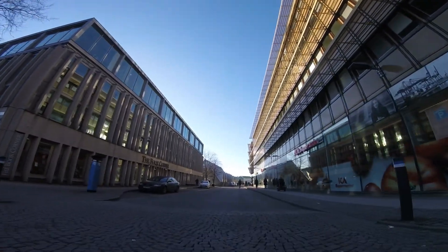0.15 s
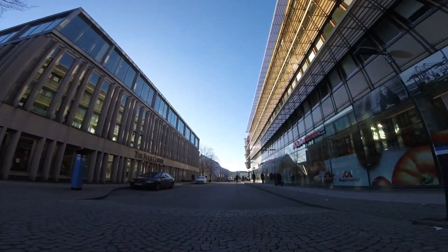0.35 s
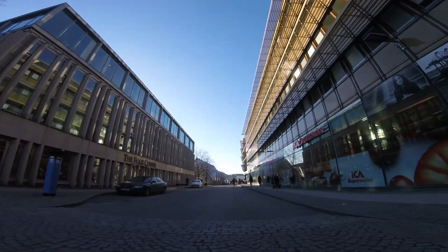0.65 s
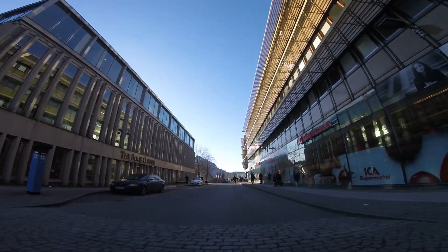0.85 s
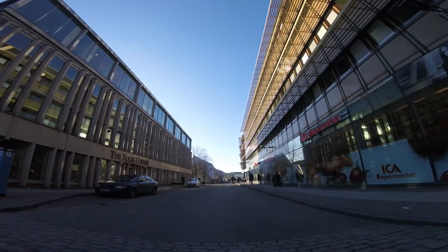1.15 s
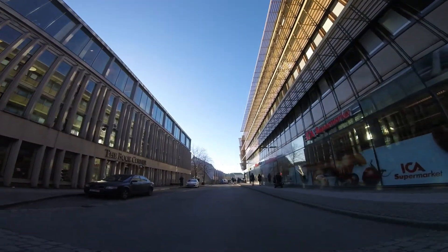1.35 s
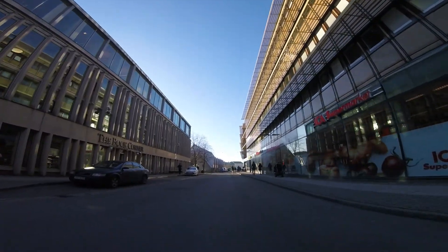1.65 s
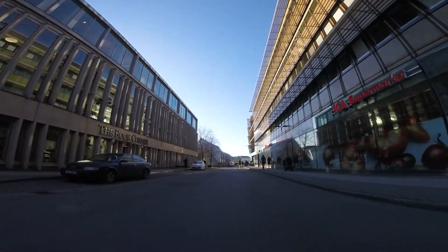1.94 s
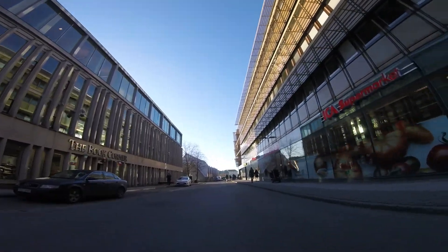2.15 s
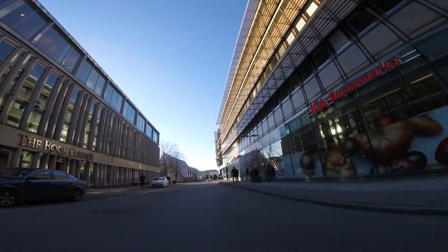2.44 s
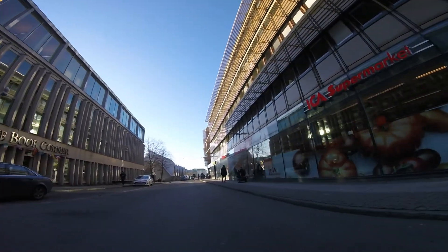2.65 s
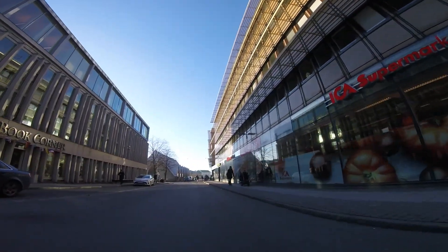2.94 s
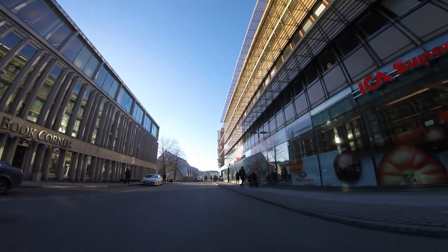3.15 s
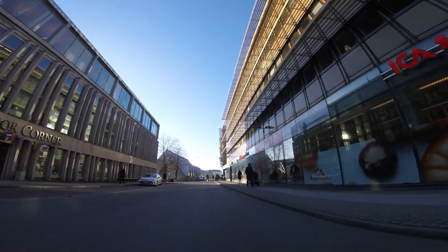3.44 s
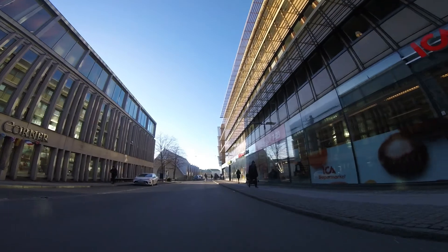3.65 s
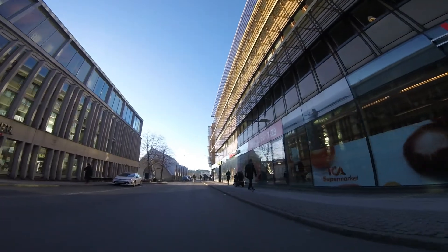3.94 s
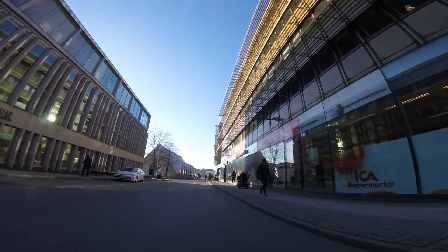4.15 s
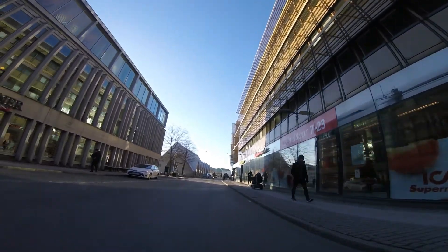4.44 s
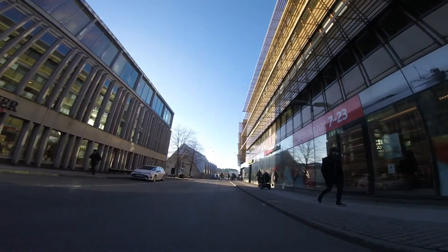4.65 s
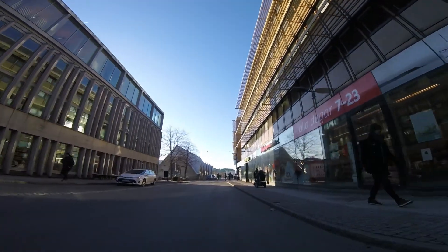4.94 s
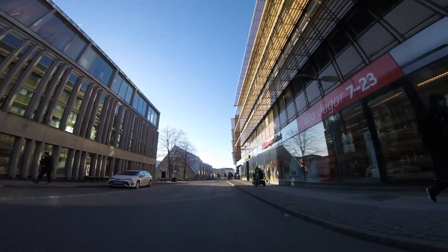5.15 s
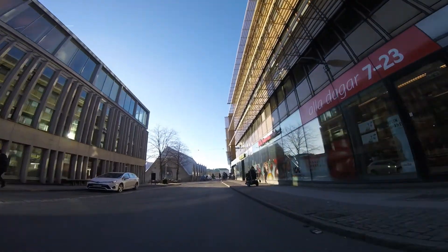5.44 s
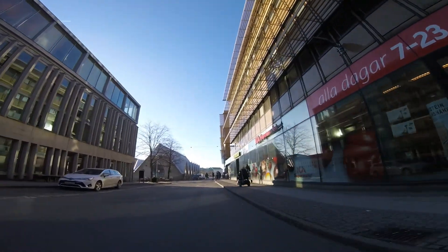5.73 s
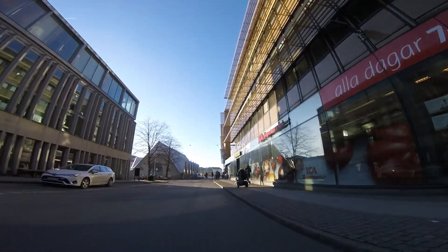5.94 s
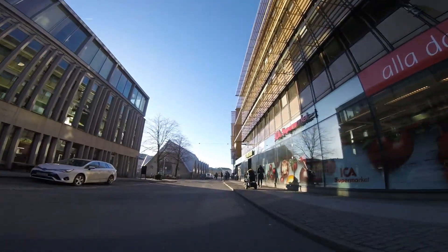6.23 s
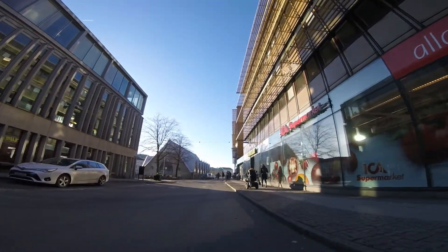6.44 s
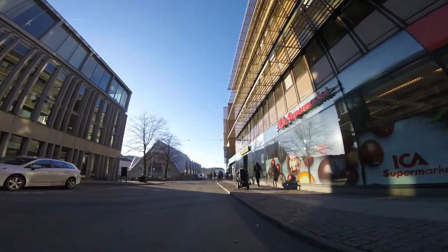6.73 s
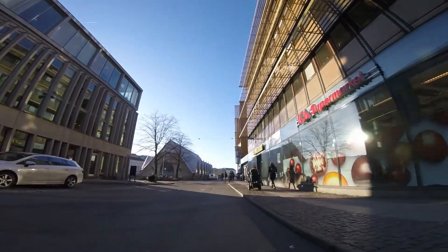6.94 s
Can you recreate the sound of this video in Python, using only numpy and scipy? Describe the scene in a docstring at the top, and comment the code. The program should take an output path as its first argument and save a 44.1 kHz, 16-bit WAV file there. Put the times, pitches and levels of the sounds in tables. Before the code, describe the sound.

A bicycle rides along a street at a steady pace, heard close up from the handlebar. From the start until about 2.2 seconds it crosses cobblestones, the loudest part: a deep, shaking rumble with rapid, uneven low thuds from the tyres, hollow knocks and faint metallic rattles. The mudguard clatters around 0.4 and 1.5 seconds, and most strongly near 2 seconds.

From about 2.4 seconds the bicycle rolls on asphalt, quieter and smoother, with a low, wavering tyre hum, light vibration and a faint rush of air. Low wind buffets the microphone, swelling just after 4 seconds and again more gently from about 5.7. The microphone mount gives short knocks near 2.8, 4.5 and 5.1 seconds, then softer ones around 6.3 and 6.8. A few pebbles tick faintly off the tread, and the rolling continues to the end at about 7 seconds.

```python
"""On a cobbled street that gives way to asphalt, a bicycle gathers speed, heard from a handlebar camera.
The road forces fork, frame and tyre walls to vibrate at their resonances, more strongly as roughness
and speed rise. The tread hums at the rate its blocks meet the ground. The camera case rumbles, shaken by
the cobbles at first, then buffeted by wind. Impacts excite decaying modes: the mount knocks on bumps,
the mudguard clatters and loose metal rattles faintly. Stones thud and pebbles tick off the tread."""
import sys
import numpy as np
from scipy import signal
from scipy.fft import rfft, irfft
from scipy.io import wavfile

SR = 44100
rng = np.random.default_rng(int(sys.argv[2]) if len(sys.argv) > 2 else 0)


def unload_audio(sound):
    """Save the sound as a 16-bit wav file, at the path given as the first command line argument."""
    columns = np.transpose(np.atleast_2d(sound))
    # keep every value between -1 and 1, then stretch to whole-number steps
    steps = np.round(np.clip(columns, -1, 1) * 32767)
    wavfile.write(sys.argv[1], SR, steps.astype(np.int16))


N = 312228

# roughness of the road, cobbles and then asphalt: (time [s], level over plain asphalt [dB])
ROUGHNESS = [(0, 10), (0.16, 8.5), (0.25, -1), (0.42, 7.5), (0.6, 7), (0.8, 6.5), (0.92, 4.5), (1.01, 0),
             (1.13, 13.5), (1.3, 5.5), (1.45, 11.5), (1.65, 2.5), (1.73, 7.5), (1.86, 3), (1.95, 8),
             (2.23, 11), (2.38, 2.5), (2.9, 2), (3.3, 1.7), (3.8, 0.8), (4.4, 4), (4.85, 0.5), (7.08, 5)]
# speed of the bicycle: (time [s], speed [m/s])
SPEED = [(0, 3.93), (1.299, 3.787), (3.499, 3.84), (5.1, 4.077), (6.099, 4.245), (7.08, 4.27)]
# bounce of tyres and fork: (frequency [Hz], bandwidth [Hz], gain [dB])
FORK_RESONANCES = [(68, 65, -11.5), (103.8, 15, 9.5), (122, 9.8, -1.5), (137, 25, -12.5)]
# frame and handlebar: (frequency [Hz], bandwidth [Hz], gain [dB])
FRAME_RESONANCES = [(147.2, 24.2, 4.5), (198, 21, -7), (237, 31, -8), (292.3, 18.6, -7.5),
                    (381.8, 53, -8.5)]
# tyre walls: (frequency [Hz], bandwidth [Hz], gain [dB])
TYRE_RESONANCES = [(519.2, 36, 5), (549.4, 16, 2.5), (694, 56, -9), (783, 40, -12), (946, 14, -23.5)]
# strength of the tread hum: (time [s], relative level [dB])
HUM_LEVEL = [(0, -25.5), (0.42, -20), (0.75, -38), (1.0, -33), (1.08, -15.5), (1.2, -27.5), (1.599, -25.5),
             (2.119, -33), (2.23, -17.5), (2.42, -29), (2.95, -43), (3.35, -21), (3.55, -34), (3.88, -20),
             (4.15, -34), (4.799, -29), (5.2, -20.5), (5.5, -32), (6.55, -21.5), (7.08, -28)]
# air in the tread grooves, heard through the tyre: (frequency [Hz], bandwidth [Hz], gain [dB])
GROOVE_RESONANCES = [(229.8, 11, 16), (350.7, 24.5, 13.5), (758, 120, -2), (802, 24, -10)]
# wheel rim: (frequency [Hz], bandwidth [Hz], gain [dB])
RIM_RESONANCES = [(1320, 380, 12.5), (1870, 840, -10.5), (2286, 180, 6), (5300, 600, -13.5),
                  (6300, 400, -12)]
# camera case: (frequency [Hz], bandwidth [Hz], gain [dB])
CASE_RESONANCES = [(4936, 200, 1), (5330, 370, 2), (6440, 250, 5), (7400, 2400, -22)]
# low rumble of the case, from cobbles at first and then wind: (time [s], relative level [dB])
RUMBLE_LEVEL = [(0, -28), (0.281, -23), (0.6, -24.5), (1.02, -22), (1.2, -19.5), (1.6, -26), (2.12, -28),
                (2.35, -32), (2.9, -38), (3.85, -37.5), (4.15, -24), (4.8, -34.5), (5.45, -32.5),
                (5.7, -29.5), (7.08, -30)]
# spectra of case rumble, rushing air and microphone hiss: (frequency [Hz], relative density [dB])
RUMBLE_SPECTRUM = [(8, -15.5), (20, 11), (35, 10.5), (55, 10.5), (75, 8.5), (120, 6.5), (300, -36),
                   (1000, -91.5)]
AIR_SPECTRUM = [(600, -10), (850, -22.5), (1100, 0.5), (1500, 1.5), (2200, 2.5), (2550, -1.5), (2900, -5.5),
                (3400, -5.5), (4100, -13.5), (6000, -13), (9000, -16.5), (11000, -34.5)]
HISS_SPECTRUM = [(2000, -8.5), (4200, -36.5), (5200, 5), (7500, 0.5), (9200, -4.5), (10400, -11.5),
                 (11800, -6), (13200, -10), (14200, -20.5)]
# knocks of the mount: (time [s], peak [dB], high-pass [Hz], low-pass [Hz], extra damping [dB/s])
KNOCKS = [(0.009, -24, 400, 1580, 308), (1.11, -30, 800, 3000, 403), (1.934, -19.5, 690, 940, 22),
          (2.576, -32, 590, 1780, 897), (2.801, -22.5, 590, 1190, 198), (4.527, -17.5, 597, 3420, 295),
          (5.097, -22, 1090, 3800, 167), (6.305, -28.5, 1000, 2490, 196), (6.787, -31.5, 700, 2200, 500)]
# camera mount: (frequency [Hz], level [dB], t60 [s])
MOUNT_MODES = [(526, 3.5, 0.015), (770, 0, 0.017), (895, -7, 0.037), (1297, -7.5, 0.018),
               (1734, -3.5, 0.017), (1924, -5.5, 0.015), (2060, -13.5, 0.086), (2470, -8, 0.011),
               (3810, -13.5, 0.0045), (5300, -17, 0.024)]
# highest stone edges under the tyre: (time [s], peak [dB], half-width of the hump [s])
THUDS = [(0.05, -15, 0.0031), (0.094, -14.5, 0.0052), (0.309, -15, 0.0034), (0.438, -13, .0028),
         (0.52, -9, 0.0024), (0.563, -11.5, 0.0045), (0.678, -9, 0.0025), (0.769, -12, 0.0037),
         (0.902, -18, 0.0047), (1.168, -5, 0.0023), (1.236, -18, .006), (1.348, -14, 0.0062),
         (1.404, -14, .005), (1.464, -8.5, 0.0032), (1.547, -10.5, 0.0033), (1.688, -9, 0.0028),
         (1.782, -7.5, 0.0024), (1.831, -18, 0.0057), (1.932, -8.5, 0.0038), (2.064, -9.5, 0.0022)]
# loose metal shaking on its own: (time [s], peak [dB], chatter time [s])
RATTLES = [(.056, -39.5, 0.018), (.087, -33, 0.011), (.184, -36, 0.017), (.298, -37, 0.009),
           (.721, -41.5, 0.031), (1.13, -43, 0.19), (1.743, -34.5, 0.0043), (1.901, -40.5, 0.02),
           (2.575, -43, 0.012), (2.696, -32, 0.0066), (3.586, -43, 0.0061), (4.51, -40, .004)]
# loose metal: (frequency [Hz], level [dB], t60 [s])
METAL_MODES = [(1900, -3, 0.012), (2570, -7, 0.021), (3440, -8.5, 0.008), (5240, 0.5, 0.009),
               (6160, 2, 0.0036), (6470, -12, 0.024), (6680, -1, 0.011), (8900, -14, 0.0038)]
# stones knocking on the tyre: (time [s], peak [dB], contact time [s])
STONES = [(0.143, -30, 0.029), (0.636, -29.5, 0.0036), (0.692, -31, 0.0042), (0.79, -28.5, 0.0052),
          (1.056, -32.5, 0.017), (1.116, -32, .005), (1.187, -31, .006), (1.221, -32, 0.0066),
          (1.27, -38, 0.0042), (1.456, -24.5, 0.0033), (1.491, -30, .006), (1.948, -21.5, 0.004),
          (2.132, -33, 0.0072), (5.515, -27.5, 0.0025)]
# proud stones and dents: (time [s], blow peak [dB], clatter peak [dB], rattle peak [dB], chatter time [s])
JOLTS = [(0.347, -34, -26.5, -42, 0.021), (0.427, -39, -30, -34.5, 0.0094),
         (0.493, -22.5, -29.5, -36, 0.013), (1.456, -25.5, -27, -42, 0.012), (1.58, -29, -25, -39, 0.012),
         (1.928, -21, -20, -29.5, 0.0095), (1.94, -26, -20, -36, 0.017), (2.018, -24, -22.5, -42, 0.022),
         (2.104, -26, -20.5, -45, 0.018), (2.191, -22, -29, -36.5, 0.023), (2.801, -41, -26, -52, 0.0034)]
# hollow frame tubes: (frequency [Hz], level [dB], t60 [s])
TUBE_MODES = [(226, 3.5, 0.037), (298.4, 3, 0.088), (390, -2, 0.07), (505, -16, 0.04)]
# mudguard and carrier: (frequency [Hz], level [dB], t60 [s])
GUARD_MODES = [(292, 4.5, 0.13), (376, 0, 0.029), (532, -0.5, 0.096), (699, 1, 0.035), (790, 5.5, 0.026),
               (864, -0.5, 0.035), (980, -4.5, 0.046), (1390, -7.5, 0.025), (1930, -4.5, 0.009),
               (2470, -8.5, 0.017), (3190, -3, 0.0024)]
# pebbles flicked off the tread: (time [s], peak [dB], pitch [Hz])
PEBBLES = [(.394, -39, 2180), (1.028, -45, 2200), (1.142, -46, 3300), (1.552, -44, 1700),
           (1.678, -41.5, 2200), (1.915, -36, 2350), (1.932, -36.5, 3430), (4.563, -46, 6200),
           (5.884, -39.5, 2000), (6.126, -44, 3900), (6.363, -44, 6940), (6.805, -46, 3200)]

# gain laws: (level when cruising on plain asphalt [dB], share of roughness [1], exponent of speed [1])
BOUNCE_LAW, SHAKE_LAW, ROAR_LAW = (-29.5, 0.66, 1.5), (-31, 0.54, 2.7), (-47.5, 0.78, 2.1)
GRIT_LAW, BUZZ_LAW, AIR_LAW = (-63.5, 0.99, 3), (-65, 0.64, 2.1), (-58, 0.085, 5.3)
CRUISE_M_PER_S, TREAD_BLOCK_SPACING_M = 4.0, 0.034
HISS_DB, CUTOFF_HZ = -67.5, 13900


def from_db(db):
    """Amplitude grows tenfold for every 20 dB."""
    return 10 ** (np.asarray(db) / 20)


def rms_one(x):
    """Normalisation to unit root-mean-square amplitude."""
    return x / np.sqrt(np.mean(x ** 2) + 1e-20)


def in_time(curve):
    """Linear interpolation of a (time, value) curve at every sample."""
    times, values = np.transpose(curve)
    return np.interp(np.arange(N) / SR, times, values)


def drift(rate_hz):
    """Low-passed noise gives a slow random fluctuation of unit rms."""
    step, settling = 40, 2000   # audio samples per step; steps for the filter to settle
    pole = np.exp(-2 * np.pi * rate_hz * step / SR)
    white = rng.standard_normal(N // step + settling + 2)
    slow = signal.lfilter([1], [1, -2 * pole, pole * pole], white)[settling:]
    return np.interp(np.arange(N) / step, np.arange(len(slow)), rms_one(slow))


def cut(x, hz, kind, order=2):
    """A Butterworth low-pass or high-pass falls 6 dB per octave for each order."""
    return signal.sosfilt(signal.butter(order, hz, kind, fs=SR, output="sos"), x)


def noise(spectrum):
    """Spectral shaping turns white noise into coloured noise of unit rms."""
    hz, db = np.transpose(spectrum)
    bins_hz = np.maximum(np.fft.rfftfreq(N, 1 / SR), 1)
    gain = from_db(np.interp(np.log(bins_hz), np.log(hz), db))
    return rms_one(irfft(rfft(rng.standard_normal(N)) * gain, N))


def grains(per_s, spread_db):
    """Shot noise: impulses at random moments, of uneven size and either sign."""
    sizes = from_db(spread_db * np.clip(rng.standard_normal(N), -2, 2)) * rng.choice([-1, 1], N)
    return sizes * (rng.random(N) < per_s / SR) + 1e-18


def resonate(force, resonances):
    """Forced vibration: the responses of parallel damped resonators add."""
    out = np.zeros(len(force))
    for hz, width_hz, db in resonances:
        radius = np.exp(-np.pi * width_hz / SR)
        feedback = [1, -2 * radius * np.cos(2 * np.pi * hz / SR), radius ** 2]
        out += from_db(db) * (1 - radius ** 2) / 2 * signal.lfilter([1, 0, -1], feedback, force)
    return out


def strike(modes, chatter_s, contacts_per_s, after_db, crack_db):
    """Convolution: each contact of a dying flurry excites a crack and the free decay of the modes."""
    t = np.arange(SR // 5) / SR
    force = from_db(after_db) * rng.standard_normal(len(t)) * (rng.random(len(t)) < contacts_per_s / SR)
    force *= np.exp(-(t / chatter_s) ** 2)
    force[0] = 1   # the first contact
    ring = np.zeros(len(t))
    for k, (hz, db, t60) in enumerate(modes):
        envelope = from_db(db + rng.standard_normal() - 60 * t / t60)
        ring += (-1) ** k * envelope * np.sin(2 * np.pi * hz * t)
    crack = cut(rng.standard_normal(len(t)), 690, "high")
    crack = cut(crack, 5300, "low", order=3) * np.exp(-t / 0.0041)
    return signal.fftconvolve(force, ring + from_db(crack_db) * crack)[:len(t)]


def add(out, s, peak_db, sound):
    """Superposition of a sound at a given time and peak level."""
    at = max(round(s * SR), 0)
    out[at:at + len(sound)] += (from_db(peak_db) * sound / np.abs(sound).max())[:N - at]


def driven(law, rough_db, speed):
    """Power law: the amplitude of a source grows with roughness and speed."""
    level_db, share, exponent = law
    return from_db(level_db + share * rough_db) * (speed / CRUISE_M_PER_S) ** exponent


def fork_bounce():
    """Mass-spring resonance: fork and tyres bounce as stones and dents push them."""
    bounce = resonate(grains(per_s=260, spread_db=4.5), FORK_RESONANCES)
    return rms_one(cut(cut(bounce, 182, "low", order=4), 55, "high"))


def frame_shake():
    """Structure-borne sound: the grain of the road shakes frame and handlebar."""
    shake = resonate(grains(per_s=1500, spread_db=4), FRAME_RESONANCES)
    return rms_one(cut(cut(shake, 373.4, "low", order=14), 130.5, "high", order=4))


def tyre_roar():
    """Random excitation: grit under the rubber rings the tyre walls."""
    roar = resonate(grains(per_s=1800, spread_db=-0.5), TYRE_RESONANCES)
    roar = cut(cut(roar, 1180, "low", order=4), 280, "high", order=4)
    return rms_one(roar) * from_db(1.7 * drift(rate_hz=11))


def tread_hum(speed):
    """Periodic excitation: the tread hums at speed over block spacing, wavering in pitch and level."""
    pitch_hz = speed / TREAD_BLOCK_SPACING_M * (1 + 0.022 * drift(rate_hz=8.87))
    phase = 2 * np.pi * np.cumsum(pitch_hz) / SR
    return np.sqrt(2) * np.sin(phase) * from_db(2 * drift(rate_hz=7.8))


def groove_drone(speed):
    """Air pumping: air squeezed from the tread drones louder the faster the wheel turns."""
    drone = resonate(rng.standard_normal(N), GROOVE_RESONANCES)
    drone = cut(cut(drone, 182, "high", order=4), 797, "low", order=6)
    return rms_one(drone) * (speed / speed.mean()) ** 6


def grit_crunch():
    """Impulse excitation: clumps of sand crunch under the tyres and tick in the rim."""
    ticks = resonate(grains(per_s=420, spread_db=4), RIM_RESONANCES) * from_db(2.5 * drift(rate_hz=16))
    return rms_one(cut(ticks, 6700, "low", order=4))


def case_buzz():
    """Contact noise: countless tiny impacts merge into a sizzle at the camera case's resonances."""
    buzz = resonate(grains(per_s=6300, spread_db=7), CASE_RESONANCES)
    buzz = cut(cut(buzz, 4200, "high", order=4), 9000, "low", order=4)
    return rms_one(buzz) * from_db(1.4 * drift(rate_hz=26))


def case_rumble():
    """Random forcing: the camera case rumbles, shaken by the cobbles at first, then buffeted by wind."""
    waver_db = 1.5 * drift(rate_hz=6.6)
    return from_db(in_time(RUMBLE_LEVEL) - 0.1 + waver_db) * noise(RUMBLE_SPECTRUM)


def air_rush():
    """Flow noise: passing air makes a broadband rush that wavers in level."""
    return noise(AIR_SPECTRUM) * from_db(drift(rate_hz=7.2))


def mount_knocks():
    """Impact of the mount on its stop: thinner if glancing, duller if soft, drier if it stays pressed."""
    out = np.zeros(N)
    for s, peak_db, highpass_hz, lowpass_hz, damping_db_per_s in KNOCKS:
        knock = strike(MOUNT_MODES, chatter_s=0.012, contacts_per_s=2000, after_db=-21, crack_db=-15)
        knock *= from_db(-damping_db_per_s * np.arange(len(knock)) / SR)
        add(out, s, peak_db, cut(cut(knock, highpass_hz, "high"), lowpass_hz, "low"))
    return out


def edge_thuds(lead_s=0.03):
    """Acceleration pulse: a stone edge lifts and drops the wheel along a Gaussian hump."""
    t = np.arange(round(2 * lead_s * SR)) / SR - lead_s
    out = np.zeros(N)
    for s, peak_db, half_width_s in THUDS:
        u = t / half_width_s
        acceleration = (u ** 2 - 1) * np.exp(-u ** 2 / 2)   # second derivative of the hump
        add(out, s - lead_s, peak_db, acceleration)
    return out


def metal_rattles():
    """Repeated impact: loose metal parts chatter in short flurries, on their own and at every jolt."""
    out = np.zeros(N)
    at_jolts = [(s, rattle_db, chatter_s) for s, _, _, rattle_db, chatter_s in JOLTS]
    for s, peak_db, chatter_s in list(RATTLES) + at_jolts:
        rattle = strike(METAL_MODES, chatter_s, contacts_per_s=2000, after_db=-1, crack_db=-0.5)
        add(out, s, peak_db, rattle)
    return out


def stone_knocks(damping_db_per_s=250):
    """Damped resonance: a stone rings the tyre walls and deadens them as it presses, a hollow knock."""
    out, t = np.zeros(N), np.arange(SR // 5) / SR
    for s, peak_db, contact_s in STONES:
        push = rng.standard_normal(len(t)) * np.exp(-(t / contact_s) ** 2)
        ring = cut(resonate(push, TYRE_RESONANCES), 1300, "low")
        add(out, s, peak_db, ring * from_db(-damping_db_per_s * t))
    return out


def jolts():
    """Shock excitation: proud stones and dents ring the frame tubes; mudguard and carrier clatter."""
    out = np.zeros(N)
    for s, blow_db, clatter_db, _, chatter_s in JOLTS:
        blow = strike(TUBE_MODES, chatter_s, contacts_per_s=1300, after_db=-10.5, crack_db=-46)
        add(out, s, blow_db, cut(blow, 520, "low", order=4))
        clatter = strike(GUARD_MODES, chatter_s, contacts_per_s=2800, after_db=-6.5, crack_db=-20)
        add(out, s, clatter_db, clatter)
    return out


def pebble_ticks(decay_s=0.0055):
    """Band-limited transients: each pebble flicked off the tread ticks at a pitch of its own."""
    out, t = np.zeros(N), np.arange(SR // 20) / SR
    for s, peak_db, hz in PEBBLES:
        band = signal.iirpeak(hz, Q=2.7, fs=SR)
        burst = rng.standard_normal(len(t)) * np.exp(-t / decay_s)
        add(out, s, peak_db, signal.lfilter(*band, signal.lfilter(*band, burst)))
    return cut(out, 9500, "low", order=4)


def scene():
    """Superposition at the handlebar: road, wheels, air and vibrating parts over microphone hiss."""
    rough_db, speed = in_time(ROUGHNESS), in_time(SPEED)
    laws = BOUNCE_LAW, SHAKE_LAW, ROAR_LAW, GRIT_LAW, BUZZ_LAW, AIR_LAW
    bounce, shake, roar, crunch, buzz, rush = (driven(law, rough_db, speed) for law in laws)
    hum = from_db(in_time(HUM_LEVEL) - 3.5)
    road = bounce * fork_bounce() + crunch * grit_crunch()
    road += pebble_ticks() + stone_knocks() + edge_thuds()
    wheels = roar * tyre_roar() + hum * tread_hum(speed) + from_db(-42.5) * groove_drone(speed)
    rumble, air = case_rumble(), rush * air_rush()
    parts = shake * frame_shake() + buzz * case_buzz() + mount_knocks() + jolts() + metal_rattles()
    hiss = from_db(HISS_DB) * noise(HISS_SPECTRUM)
    return (road + wheels + rumble + air + parts + hiss)[None]


def record(dry):
    """Band limiting: an elliptic low-pass cuts the highest treble steeply."""
    return signal.sosfilt(signal.ellip(10, 0.1, 90, CUTOFF_HZ, fs=SR, output="sos"), dry)


dry = scene()
out = record(dry)
unload_audio(out)
```